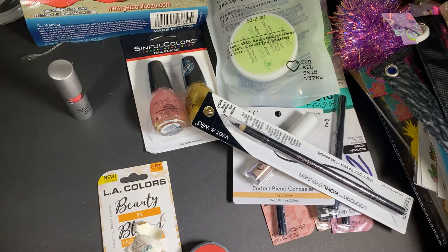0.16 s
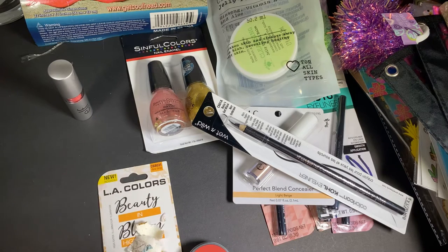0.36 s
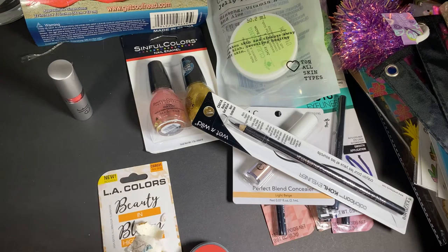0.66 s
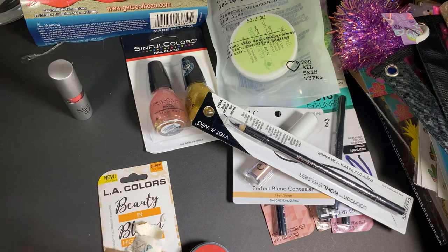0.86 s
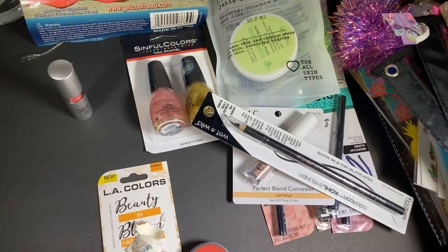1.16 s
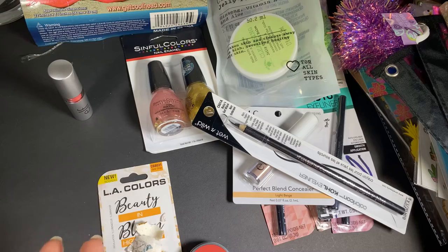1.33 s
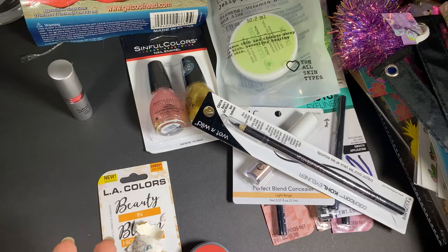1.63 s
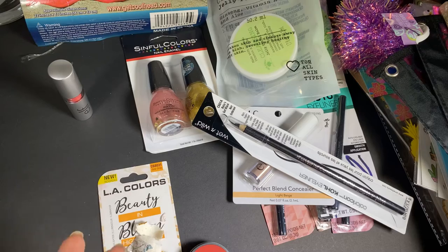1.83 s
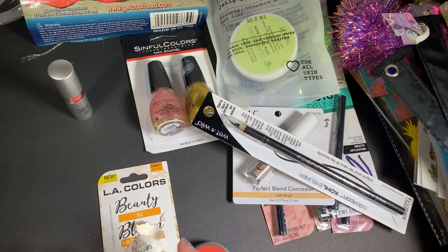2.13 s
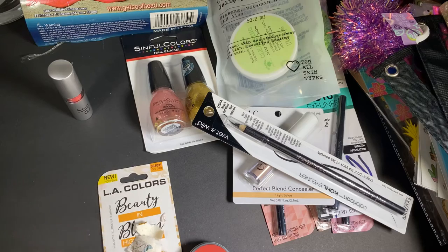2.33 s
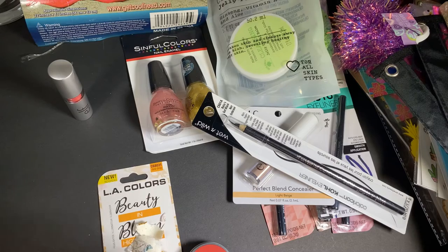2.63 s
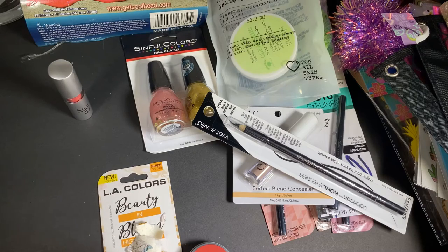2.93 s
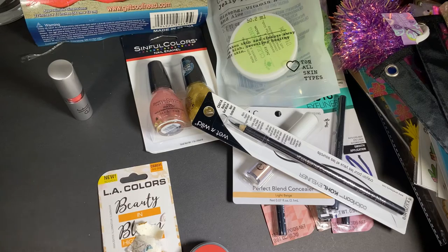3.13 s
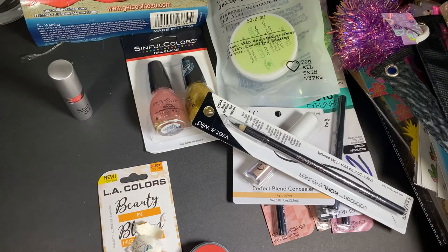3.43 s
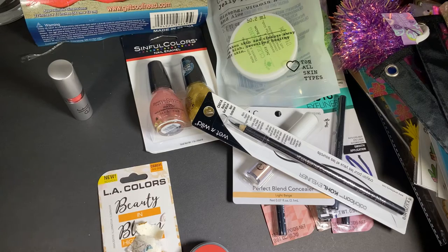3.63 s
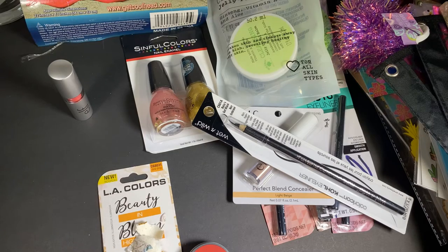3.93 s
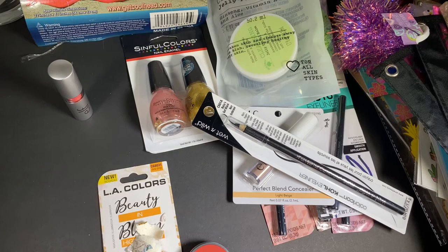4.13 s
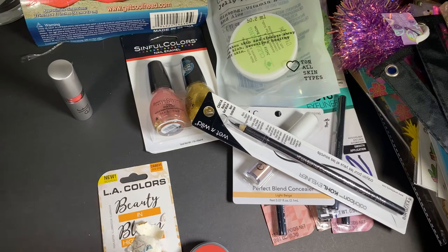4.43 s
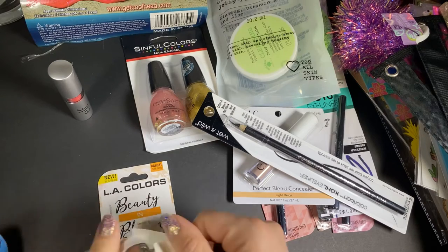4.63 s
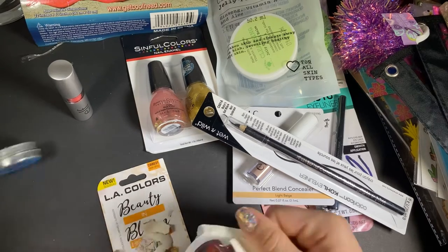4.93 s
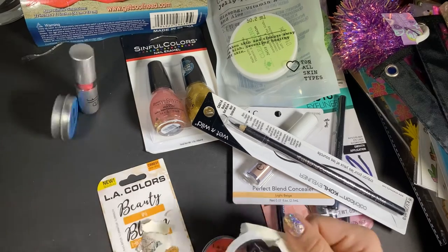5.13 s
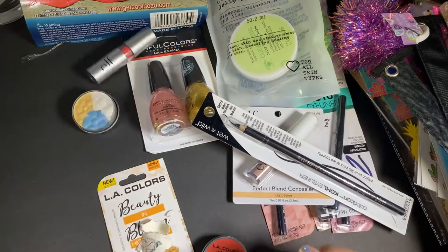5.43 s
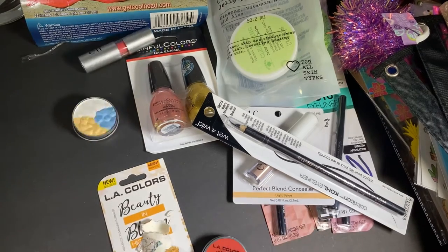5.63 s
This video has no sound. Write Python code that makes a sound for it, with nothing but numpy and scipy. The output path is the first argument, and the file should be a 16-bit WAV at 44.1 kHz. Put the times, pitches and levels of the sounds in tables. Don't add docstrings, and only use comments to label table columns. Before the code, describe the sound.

Crinkly plastic wrapping is worked by hand, starting faintly with a short scrape and scattered crackles, growing into strong snaps, creaks and a tiny squeak. Then a tin hits the table with the loudest knock, bounces once strongly and rolls with low wobbling and light metallic taps. It topples a tube, whose cap clicks and drags to rest. Dry, close, single-channel phone sound, indoors, low hum underneath.

```python
import sys
import numpy as np
from scipy import signal
from scipy.fft import rfft, irfft, next_fast_len
from scipy.io import wavfile
from scipy.ndimage import uniform_filter1d, map_coordinates

SR = 44100
rng = np.random.default_rng(int(sys.argv[2]) if len(sys.argv) > 2 else 0)


def makeup_ratio(level_db):
    decades = np.asarray(level_db, float) / 20
    return 10 ** decades


def dump(signal):
    limited = np.clip(np.atleast_2d(signal).T, -1, 1)
    pcm = np.round(limited * 32767).astype(np.int16)
    wavfile.write(sys.argv[1], SR, pcm)


N = 254929

# start in seconds,
# hold in seconds, pressure in dB, brightness in dB.
STROKES = [(0.0, 0.045, -67.5, -6), (0.154, 0.24, -67.5, -2.5), (0.223, 0.095, -93, 23),
           (0.355, 0.012, -68, 16.5), (0.515, 0.01, -74, 15.5), (0.554, 0.083, -101.5, 11.5),
           (.708, .02, -80, 10.5), (1.118, 0.04, -89, 21), (1.168, 0.051, -86.5, 20.5),
           (1.698, 0.073, -66.5, -1.5), (1.832, 0.041, -64.5, 4.5), (1.882, 0.099, -64, 0.5),
           (2.07, 0.13, -64.5, -3.5), (2.091, 0.11, -61, 4.5), (2.283, 0.0079, -52.5, 0.5),
           (2.36, 0.013, -57, 1.5), (2.52, 0.12, -94, 5), (2.702, 0.04, -77.5, 6), (2.85, 0.13, -66.5, 4.5),
           (3.015, 0.082, -61, 4.5), (3.161, 0.016, -57.5, 2), (3.289, 0.029, -58.5, -10),
           (3.353, 0.08, -56.5, -2), (3.475, 0.088, -63, -2), (3.768, 0.022, -72.5, -4),
           (3.821, 0.093, -62.5, 2), (3.941, 0.056, -58.5, -5), (4.018, 0.1, -73.5, 1.5),
           (4.116, 0.074, -56, -6.5), (4.226, 0.046, -52.5, -1), (4.334, 0.082, -60, -4),
           (4.481, 0.061, -64, 3), (4.707, 0.019, -40, -10), (5.404, 0.34, -60.5, 0)]
# frequency in Hz, level in dB.
FIZZ = [(2060, -41), (3500, -44.5), (4780, 5.5), (7010, 1), (11800, -5.5), (15600, -8.5), (16200, -12),
        (16500, -54.5)]
BODY = [(760, -31.5), (1300, -11), (1760, -7), (2080, 4.5), (2250, -1.5), (2730, 1.5), (3070, 0.5),
        (4010, -4.5), (4300, 1.5), (5590, -51), (9460, -120)]
RUSTLE = [(260, -52), (450, -29.5), (694, -19.5), (760, -27.5), (963, -10.5), (1260, -22), (1500, -16),
          (1950, -51), (3300, -120)]
PRESS_DB_PER_S, LIFT_DB_PER_S = 721, 269
JOLT_DB_PER_S, CALM_DB_PER_S = 1194, 404.5

# time in seconds, pitch in Hz, level in dB, upper tone in dB.
SLIDES = [
    [(0, 1410, -53.5, -69), (.05, 1340, -59, -74), (.12, 1270, -66, -76), (.16, 1200, -65, -63),
     (.2, 1190, -70, -62), (.26, 1140, -67, -74)],
    [(5.6, 1420, -51, -75), (5.66, 1410, -64, -75), (5.7, 1407, -61, -81), (5.78, 1440, -49, -72)],
]

# frequency in Hz, level in dB.
HUM = [(120, -52), (360, -78)]
# time in seconds, change in dB.
HUM_SAG = [(0, 2.5), (.1, -0.5), (5.19, 0), (5.225, -9), (5.27, 1), (5.4, -2.5)]
# frequency in Hz, level in dB.
AIR = [(135, -12), (180, -20), (400, -24), (800, -31), (1500, -37), (3000, -40), (6000, -42), (12000, -50),
       (15800, -56), (16300, -75)]
DEEP = [(15, -65), (25, -45), (48, -19.5), (67, -19), (86, -19), (100, -32), (130, -29.5), (220, -120)]

# start in seconds, peak in dB, crease pitch (or pitch of the
# burst) in Hz, after-crackle in dB.
POPS = [(0.146, -54.5, 1190, -4), (0.346, -38, 1000, -3), (0.678, -46, 950, 0.5), (0.939, -41, 970, -50),
        (1.025, -37.5, 760, -8), (1.113, -43, 960, -8.5), (1.169, -42, 980, -3), (1.217, -38.5, 1090, -11),
        (1.667, -19.5, 906, -16), (2.371, -33.5, 1040, -16), (2.647, -44, 950, -8), (2.75, -46, 950, -4),
        (2.781, -44.5, 905, -19), (2.946, -37, 940, -28), (2.976, -39.5, 980, -29), (3.537, -26, 740, -15),
        (3.724, -45, 1160, -6.5), (4.249, -42.5, 947, -1), (4.404, -43, 880, -18)]
CRACKS = [(5.322, -37, 3400, -2), (1.399, -24, 2640, -6.5), (1.419, -32, 2800, -2.5),
          (1.649, -20, 2700, -6.5), (1.656, -32, 2600, -21), (2.5, -39.5, 1900, -17),
          (2.572, -45, 1700, -4), (3.963, -46, 2030, -18), (4.17, -53, 3000, -25),
          (4.586, -33.5, 3450, -10), (0.525, -46.5, 1610, -5)]
TEARS = [(0.522, -43, 7900, -15), (0.71, -37.5, 1830, -7), (1.808, -27, 2340, -19), (1.947, -46, 2180, 2.5),
         (2.189, -33, 2500, -20), (2.271, -29.5, 2880, -29), (2.365, -31, 4640, -8.5),
         (3.04, -30.5, 4760, -8), (4.114, -30.5, 2820, -8)]
FLICKS = [(1.884, -24, 4540, -15), (3.173, -32, 3300, -12), (3.277, -44.5, 2400, -30),
          (3.391, -26.5, 2070, -15), (3.895, -40.5, 4050, 1.5), (4.221, -21.5, 2050, -21),
          (4.484, -44.5, 2650, -2), (2.058, -50, 2500, 3)]
SPLITS = [(0.225, -41, 6740, -20), (0.236, -45, 11700, 7), (0.312, -30, 9700, 7), (1.217, -37, 6350, -16),
          (2.082, -36, 5050, -7), (2.844, -46.5, 3740, 0), (3.018, -45, 5060, 10), (3.658, -52, 12100, -5),
          (3.829, -56, 4120, 13.5)]
# frequency in Hz, level in dB per Hz.
FILM = [(290, -16), (500, -17), (885, -11.5), (1790, -16.5), (2690, -18), (3660, -15.5), (7710, -14.5),
        (14700, -19), (15800, -21), (16500, -47)]

# start in seconds, peak in dB, pitch in Hz.
CREAKS = [(0.3126, -5.5, 9500), (1.606, -43, 11000), (1.8844, -30.5, 4200), (3.375, -25, 3800),
          (3.383, -24, 5000), (3.394, -24, 1700), (3.392, -19.5, 7700), (3.4164, -30, 3800),
          (3.428, -40, 5390), (3.4394, -30, 7900), (3.457, -30, 4270), (3.4787, -33, 3500),
          (3.51, -26, 4770), (3.536, -28, 6000), (3.6566, -31, 12000), (3.8297, -29.5, 10800),
          (4.1496, -26, 4040), (4.222, -12, 2600), (1.408, -22, 6000), (1.438, -31, 7800),
          (1.669, -24, 5200), (4.186, -40, 4000), (4.195, -39, 3500), (4.203, -42, 4500), (4.23, -30, 3000),
          (4.259, -34, 3200), (4.27, -35, 4800), (2.369, -24, 6000), (2.173, -33, 5500)]
# start in seconds, seconds between slips, length in seconds, last slip in dB, pitch in Hz.
SLIP_RUNS = [
    (0.157, 0.01, 0.058, -41, 11800),
    (3.2954, 0.0062, 0.072, -31.5, 5650),
    (4.209, 0.011, 0.045, -24, 3400),
]

# start in seconds, peak in dB, pitch in Hz.
THUMPS = [(1.028, -51, 280), (1.399, -44.5, 340), (1.42, -56, 550), (1.65, -44.5, 244), (1.669, -54, 527),
          (2.2, -71, 540), (3.536, -50, 530)]
# start in seconds, peak in dB, pitch in Hz, seconds to fade by 60 dB.
PINGS = [(1.028, -43, 274, 0.11), (1.812, -47, 950, 0.045), (1.885, -39.5, 770, 0.025),
         (1.884, -36, 2600, 0.033), (2.198, -49.5, 570, .1), (2.272, -42.5, 2880, 0.034),
         (2.369, -43, 950, 0.053), (3.172, -38.5, 3350, 0.036), (3.277, -44.5, 2800, 0.017),
         (3.276, -47, 1110, 0.03), (3.391, -32.5, 1555, 0.027), (3.392, -38, 2060, 0.067),
         (3.536, -32.5, 477, 0.015), (1.404, -32.5, 530, .03), (1.652, -32.5, 600, 0.033),
         (4.485, -46, 2650, 0.044), (4.988, -44, 3120, 0.038), (5.031, -63, 2970, 0.12),
         (5.054, -33, 3090, 0.027), (5.068, -36, 3090, 0.033), (5.075, -32.5, 3020, .04),
         (5.333, -47, 1800, 0.18), (5.335, -35, 1378, 0.12), (5.408, -40, 900, 0.068),
         (5.432, -40, 950, 0.11), (5.582, -47.5, 1000, .05)]
# time in seconds, pitch in Hz, level in dB.
SQUEAK = [(4.005, 5748, -66), (4.057, 5812, -61), (4.093, 5470, -64), (4.105, 5630, -57)]

# start in seconds, peak in dB, thump in dB, crackle after the crack
# in dB.
KNOCKS = [
    (4.6007, -4.5, -4, -11),
]
BOUNCES = [
    (4.7037, -12.5, -5.5, -13.5),
    (4.744, -44.5, -5, -4),
]
NUDGES = [(4.872, -49.5, -2.5, -9), (4.927, -50, -5, 1), (4.974, -47, -10, 1), (4.99, -50, -3, -12),
          (5.106, -51.5, 2, 1.5), (5.178, -48.5, -9, -9)]
TAPS = [
    (5.0535, -26.5, -17, -4.5),
    (5.068, -49, -10, -10),
    (5.077, -43.5, 3, -14),
    (5.091, -46, 5.5, 3),
]
TOPPLE = [
    (5.3303, -15, -3.5, -12),
    (5.407, -33.5, -19, -25),
    (5.432, -37.5, -7, 0),
]
SETTLE = [(5.485, -36.5, -22, -17), (5.494, -26.5, -13, -3), (5.539, -42, -10, -6), (5.579, -58, 1, 6),
          (5.611, -41, -10, -13), (5.678, -59, -4, 18)]
# pitch in Hz, width in Hz, level in dB.
TIN = [(1410, 100, 3), (1630, 150, 0), (2274, 100, 1), (3440, 190, 1.5), (3960, 160, 2), (4200, 250, 0.5),
       (5500, 170, 0), (6800, 500, 1), (7710, 220, 6), (8090, 170, -3.5), (10800, 500, -3),
       (12400, 900, -18)]
RIM = [(1370, 260, -8), (2016, 63, -5), (3090, 210, 0), (4000, 310, -12), (7860, 400, -6), (10500, 470, -6),
       (11330, 480, -10)]
TUBE = [(950, 190, 1), (1378, 81, 2), (1800, 95, 4), (2600, 140, -2), (3420, 260, -3), (4970, 610, -4.5)]
CAP = [(950, 130, -1.5), (1750, 116, -3), (2450, 100, -4), (2866, 64, 6.5), (3120, 170, 5), (3450, 82, 3.5),
       (4050, 180, -2), (5720, 400, -4), (6400, 230, -9), (7200, 290, -12), (10800, 640, -8)]
# pitch in Hz, level in dB, seconds to fade by 60 dB.
TABLE_FLAT = [(62, -22, .15), (94, -17, .14), (160, -26, .12), (243, -14, .12), (327, -7, .05),
              (380, -10, .04), (445, -18, .09), (505, -28, .09), (589, -17, .07), (644, -20, .06),
              (860, -28, .09), (986, -31, .11)]
TABLE_EDGE = [(123, -26, .2), (154, -37, .08), (240, -36, .1), (329, -21, .08), (365, -29, .12),
              (480, -31, .08), (610, -38, .06), (1070, -30, .05), (1440, -32, .06)]
TABLE_FAR = [(73, -34, .15), (105, -33, .12), (165, -25, .1), (240, -34, .15), (326, -18, .075),
             (375, -28, .06), (435, -27, .06), (530, -29, .08), (840, -33, .07), (950, -35, .1)]
# frequency in Hz, level in dB per Hz.
CLANK = [(290, -19), (700, -7), (1370, -6), (3770, -9.5), (6190, -13.5), (7820, -19.5), (9600, -20.5),
         (11300, -23.5), (15800, -24), (16500, -57.5)]
THUD = [(60, -29), (120, -1), (300, -2.5), (600, -6.5), (1000, -28)]

# start in seconds, hold in seconds, level in dB.
JOLTS = [(4.625, 0.0088, -29), (4.709, 0.035, -37.5), (4.8, 0.039, -64.5), (4.937, 0.047, -58.5),
         (5.062, 0.05, -46.5), (5.2, 0.0095, -59), (5.343, 0.0049, -39), (5.39, 0.11, -44.5),
         (5.555, 0.12, -55), (5.701, 0.11, -49.5)]
# start in seconds, hold in seconds, level in dB.
TRUNDLES = [
    (4.72, 0.011, -63),
    (5.41, 0.031, -48.5),
    (5.52, 0.068, -62),
    (5.66, 0.19, -57.5),
]
# frequency in Hz, level in dB.
SHAKE = [(24, -41), (40, -37), (76, -6), (101, -22), (114, 0.5), (162, -10), (200, -10.5), (450, -19.5),
         (580, -30), (990, -120)]
# time in seconds, pitch in Hz, level in dB.
ROCKS = [
    [(4.725, 132, -35), (4.735, 131, -41), (4.759, 146, -35.5), (4.763, 150, -36.5), (4.8, 150, -42)],
    [(4.92, 131, -46), (4.968, 130, -37), (4.978, 132, -63), (4.99, 132, -43), (5.01, 132, -55)],
    [(5.06, 135, -54), (5.072, 133, -38), (5.082, 131, -62), (5.106, 130, -50.5), (5.16, 131, -47)],
]
# start in seconds, hold in seconds, level in dB.
GRINDS = [(5.505, 0.049, -51), (5, 0.031, -61.5), (5.44, .03, -54)]


def unit(x):
    return x / np.sqrt(np.mean(x ** 2) + 1e-20)


def along(points, hz):
    f, v = np.transpose(points)
    return makeup_ratio(np.interp(np.log(hz + 1), np.log(f + 1), v, left=-120, right=-120))


def bell(hz, centre_hz, octaves):
    return 1 / (1 + (np.log2((hz + 1) / centre_hz) / octaves) ** 2)


def resonances(peaks):
    def gain(f):
        total = sum(makeup_ratio(db) * f * w / (c * c - f * f + 1j * f * w) for c, w, db in peaks)
        return np.abs(total) ** 1.4
    return gain


def curves(rows):
    s, *cols = np.transpose(rows)
    return [np.interp(np.arange(N) / SR, s, c, left=-120) for c in cols]


def wobble(rate):
    knots = rng.standard_normal(int(N * rate / SR) + 4)
    return map_coordinates(knots, [np.arange(N) * rate / SR])


def noise(gain, size):
    spectrum = rfft(rng.standard_normal(size))
    return unit(irfft(spectrum * gain(np.fft.rfftfreq(size, 1 / SR)), size))


def steady(spectrum):
    return noise(lambda hz: along(spectrum, hz), next_fast_len(N))[:N]


def held(gestures, rise_db_per_s, fall_db_per_s, shares=1):
    s, hold_s, db = np.transpose(gestures)[:3, :, None]
    t = np.arange(0, N, 32) / SR
    rise_db = rise_db_per_s * np.maximum(s - t, 0)
    fall_db = fall_db_per_s * np.maximum(t - s - hold_s, 0)
    gains = shares * makeup_ratio(db - rise_db - fall_db)
    return np.interp(np.arange(N) / SR, t, gains.sum(axis=0))


def burst(t, ms, after_db, after_s):
    u = t * 1000 / np.clip(ms, .3, 40)
    tail = (1 - np.exp(-u)) * np.exp(-(t / after_s) ** 2)
    return u * np.exp(1 - u) + makeup_ratio(after_db) * tail


def duller(x, t):
    low = uniform_filter1d(x, size=3)
    return low + (x - low) * np.exp(-t / 0.028)


def add(out, s, x):
    out[round(s * SR):][:len(x)] += x


def patchy(x, patchy_db):
    z = signal.stft(x, nperseg=256)[2]
    field = uniform_filter1d(rng.standard_normal(z.shape), 3, 0)
    field = uniform_filter1d(field, 10, 1)
    return signal.istft(z * makeup_ratio(patchy_db * unit(field)), nperseg=256)[1][:N]


def crinkles(count, cycles, spread_db):
    at, pitch, size = rng.random((count, 3)).T
    hz = (600 + 14000 * pitch ** 1.5)[:, None]
    t = np.arange(400) / SR
    level = makeup_ratio(-spread_db * np.log(size + 0.014))[:, None] * np.sqrt(hz)
    rows = level * np.exp(-t * hz / cycles) * np.sin(2 * np.pi * hz * t)
    where = (at * N).astype(int)[:, None] + np.arange(400)
    return unit(np.bincount(where.ravel(), rows.ravel())[:N])


def rub():
    sheet = makeup_ratio(1.9 * wobble(300) + 2.5 * wobble(40)) * rng.standard_normal(N)
    sheet = patchy(sheet, patchy_db=2) + .8 * crinkles(count=12000, cycles=7, spread_db=3.5)
    size = next_fast_len(N + 1, True) // 2 * 2
    hz = np.fft.rfftfreq(size, 1 / SR)
    spectrum = rfft(sheet, size)
    bright_db = np.transpose(STROKES)[-1, :, None]
    rustle_db = -7.5 - 0.37 * bright_db
    out = np.zeros(N)
    for db, colour in [(bright_db, FIZZ), (0, BODY), (rustle_db, RUSTLE)]:
        pressure = held(STROKES, PRESS_DB_PER_S, LIFT_DB_PER_S, makeup_ratio(db))
        region = unit(irfft(spectrum * along(colour, hz))[:N])
        out += pressure * makeup_ratio(1.3 * wobble(22.87)) * region
    return out


def slides():
    out = np.zeros(N)
    for rows in SLIDES:
        hz, db, upper_db = curves(rows)
        turn = 2 * np.pi * np.cumsum(hz) / SR
        main = makeup_ratio(db) * (.7 * wobble(450) + wobble(70)) * np.sin(turn)
        upper = makeup_ratio(upper_db) * wobble(300) * np.sin(2.58 * turn)
        touching = np.arange(N) < rows[-1][0] * SR
        out += touching * (main + upper)
    return out


def room():
    t = np.arange(N) / SR
    drift = 0.055 * np.cumsum(wobble(2.7)) / SR
    hum = np.zeros(N)
    for hz, db in HUM:
        hum += np.sqrt(2) * makeup_ratio(db + 0.4 * wobble(18)) * np.sin(2 * np.pi * (hz * t + drift))
    air = makeup_ratio(-65.5 + wobble(1.7)) * steady(AIR)
    deep = makeup_ratio(-71.5 + 2.4 * wobble(2.6)) * steady(DEEP)
    return hum * makeup_ratio(curves(HUM_SAG)[0]) + air + deep


def grainy(size, depth_db, smooth_hz):
    width = int(smooth_hz * size / SR) + 1
    grain = uniform_filter1d(rng.standard_normal(size // 2 + 1), width, mode="wrap")
    return makeup_ratio(depth_db * unit(grain))


def snap(events, bright_db, ms):
    out, t = np.zeros(N + SR), np.arange(SR // 5) / SR
    hz = np.fft.rfftfreq(len(t), 1 / SR)
    tilt = makeup_ratio(-8.5 + (bright_db + 11) * np.log2((hz + 1) / 3000) / 2)
    for s, db, crease_hz, after_db in events:
        sheet = grainy(len(t), depth_db=3, smooth_hz=350) * tilt
        small = 1 / (1 + (crease_hz / 5.5 / (hz + 1)) ** 2)
        parts = along(FILM, hz) * [small * sheet, 1.3 * bell(hz, crease_hz, octaves=.11)]
        crack, ping = unit(irfft(rfft(rng.standard_normal(len(t))) * parts, len(t)))
        crack = burst(t, ms, after_db, after_s=0.054) * crack
        ping = burst(t, ms * 1.14, after_db + 2, after_s=0.05) * ping
        add(out, s - .001, makeup_ratio(db - 18.5) * duller(crack + ping, t))
    return out[:N]


def snaps():
    return (snap(POPS, bright_db=-16, ms=3.2) + snap(CRACKS, bright_db=-14, ms=3.4)
            + snap(TEARS, bright_db=-11, ms=4.76) + snap(FLICKS, bright_db=-15.5, ms=2.6)
            + snap(SPLITS, bright_db=-6.5, ms=3.4))


def creak():
    out, t = np.zeros(N + SR), np.arange(SR // 20) / SR
    slips = []
    for s, gap, length, db, hz in SLIP_RUNS:
        for u in np.arange(0, length, gap):
            slip_db = db - 198 * (length - u) + 1.3 * rng.standard_normal()
            slips.append((s + u, slip_db, hz))
    for s, db, pitch_hz in CREAKS + slips:
        tick = noise(lambda hz: along(FILM, hz) * (bell(hz, pitch_hz, octaves=0.35) + makeup_ratio(-23)), len(t))
        add(out, s - .0005, makeup_ratio(db - 16) * burst(t, 0.87, -34.5, after_s=0.014) * tick)
    return out[:N]


def thumps():
    out, t = np.zeros(N + SR), np.arange(SR // 5) / SR
    for s, db, pitch_hz in THUMPS:
        bump = noise(lambda hz: bell(hz, pitch_hz, octaves=.25) ** 2, len(t))
        add(out, s, makeup_ratio(db) * burst(t, 5, -12, after_s=.04) * bump)
    return out[:N]


def pings():
    out, t = np.zeros(N + SR), np.arange(SR // 5) / SR
    for s, db, hz, t60 in PINGS:
        add(out, s, makeup_ratio(db - 60 * t / t60) * (1 - np.exp(-t / 0.0004)) * np.sin(2 * np.pi * hz * t))
    return out[:N]


def glide(rows, fade_s, sway_db=0):
    hz, db = curves(rows)
    t = np.arange(N) / SR
    fade = np.clip(np.minimum(t - rows[0][0], rows[-1][0] - t) / fade_s, 0, 1)
    return np.sqrt(2) * fade * makeup_ratio(db + sway_db) * np.sin(2 * np.pi * np.cumsum(hz) / SR)


def squeak():
    return glide(SQUEAK, fade_s=0.0062, sway_db=1.9 * wobble(80))


def boom(t, table):
    tones = sum(makeup_ratio(db - 60 * t / t60) * np.sin(2 * np.pi * hz * t) for hz, db, t60 in table)
    modes = (1 - np.exp(-t * 800)) * tones
    return modes / np.max(np.abs(modes))


def knocks(events, peaks, table, ring_db, ms, thud_db):
    out, t = np.zeros(N + SR), np.arange(SR // 5) / SR
    for s, db, thump_db, crackle_db in events:
        crack = burst(t, ms, crackle_db, after_s=0.05) * noise(lambda hz: along(CLANK, hz), len(t))
        rattle = burst(t, 2 * ms, -13.0, after_s=0.057) * noise(resonances(peaks), len(t))
        ring = np.zeros(len(t))
        for hz, width, level in peaks:
            ring += makeup_ratio(level) * np.exp(-np.pi * width * t / 5) * np.sin(2 * np.pi * hz * t)
        ring = ring / np.max(np.abs(ring)) * (1 - np.exp(-t * 1000 / ms))
        thud = burst(t, 5, -7, after_s=0.054) * noise(lambda hz: along(THUD, hz), len(t))
        body = makeup_ratio(ring_db) * (rattle + makeup_ratio(-1) * 2 * ring)
        add(out, s - .001, makeup_ratio(db - 14.5) * (duller(crack, t) + body))
        add(out, s, makeup_ratio(db + thump_db) * (boom(t, table) + makeup_ratio(thud_db) * thud))
    return out[:N]


def roll():
    shake = held(JOLTS, JOLT_DB_PER_S, CALM_DB_PER_S) * steady(SHAKE)
    grit = noise(lambda hz: along(CLANK, hz) * bell(hz, 670, octaves=0.88), next_fast_len(N))[:N]
    grit = makeup_ratio(wobble(180)) * grit
    return shake + held(TRUNDLES, PRESS_DB_PER_S, LIFT_DB_PER_S) * grit


def rocking():
    return sum(glide(rows, fade_s=0.0096) for rows in ROCKS)


def grind():
    singing = noise(resonances(CAP), next_fast_len(N))[:N]
    return held(GRINDS, PRESS_DB_PER_S, CALM_DB_PER_S) * makeup_ratio(3.0 * wobble(150)) * singing


def scene():
    film = rub() + snaps() + creak() + squeak() + thumps()
    tin = (knocks(KNOCKS, TIN, TABLE_FLAT, ring_db=-2.0, ms=2.2, thud_db=-15)
           + knocks(BOUNCES, TIN, TABLE_EDGE, ring_db=-4.0, ms=2.0, thud_db=-20)
           + knocks(TAPS, RIM, TABLE_EDGE, ring_db=2, ms=1.9, thud_db=-15.5)
           + knocks(NUDGES, RIM, TABLE_FLAT, ring_db=-25, ms=2.6, thud_db=-6))
    tube = (knocks(TOPPLE, TUBE, TABLE_FAR, ring_db=-3.0, ms=2.7, thud_db=-17)
            + knocks(SETTLE, CAP, TABLE_FAR, ring_db=8.5, ms=2.1, thud_db=-7) + grind())
    return (film + pings() + rocking() + tin + tube + slides() + roll() + room())[None]


def band_limit(x):
    return signal.sosfilt(signal.butter(12, 16980, fs=SR, output="sos"), x)


def record(dry):
    low_cut = signal.butter(4, 58, "high", fs=SR, output="sos")
    top_cut = signal.butter(12, 16300, fs=SR, output="sos")
    mix = signal.sosfilt(np.vstack([low_cut, top_cut]), dry)
    return band_limit(mix)


dry = scene()
out = record(dry)
dump(out)
```